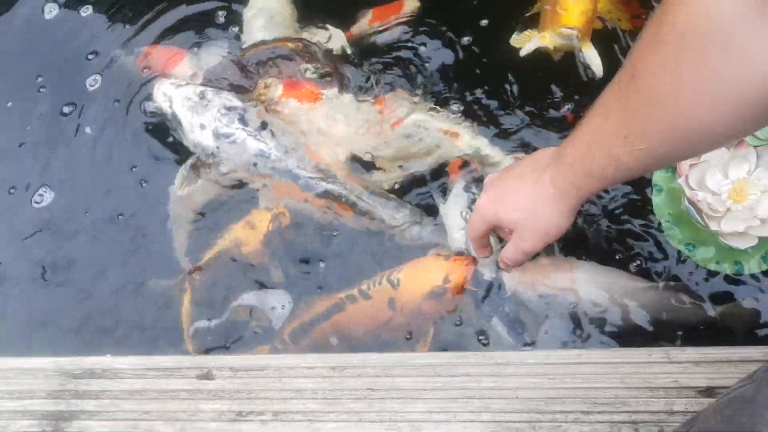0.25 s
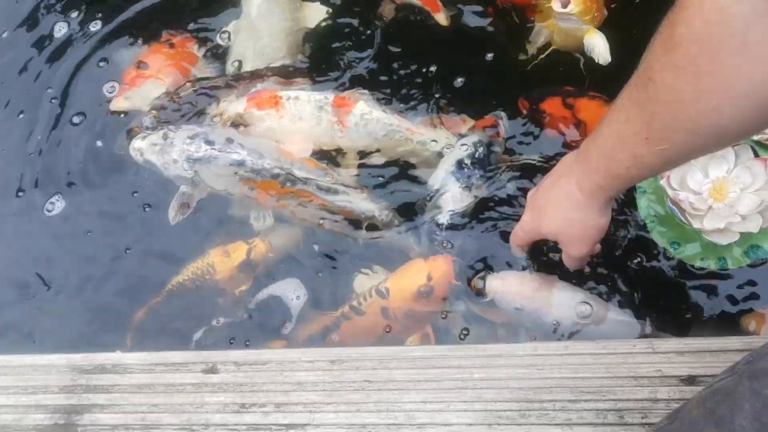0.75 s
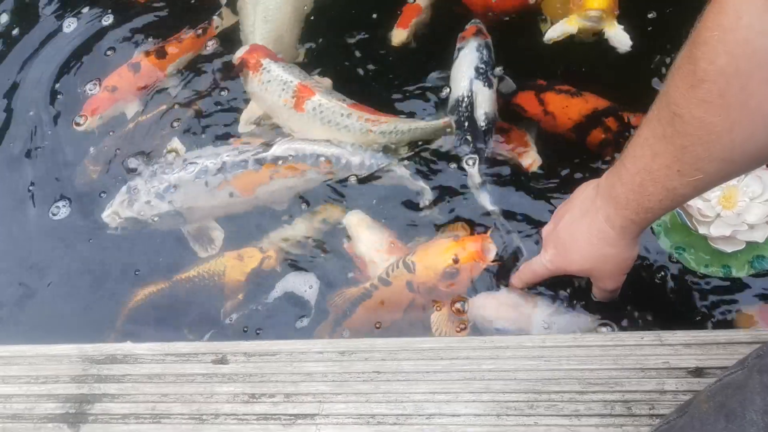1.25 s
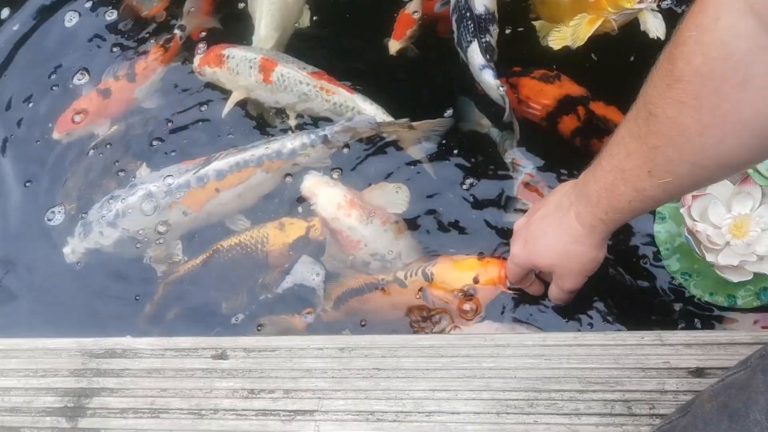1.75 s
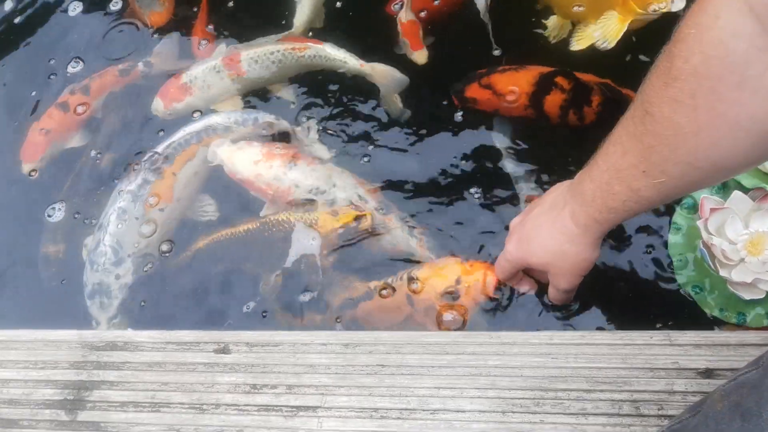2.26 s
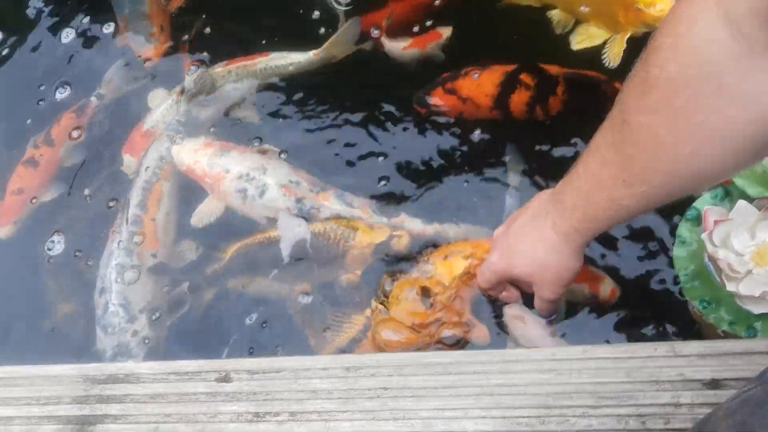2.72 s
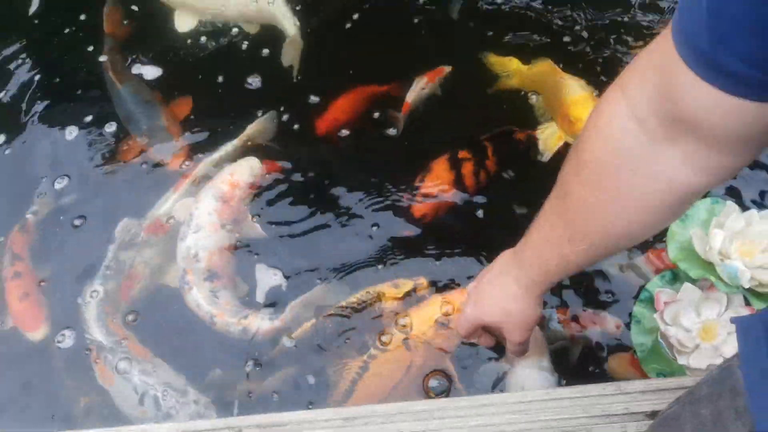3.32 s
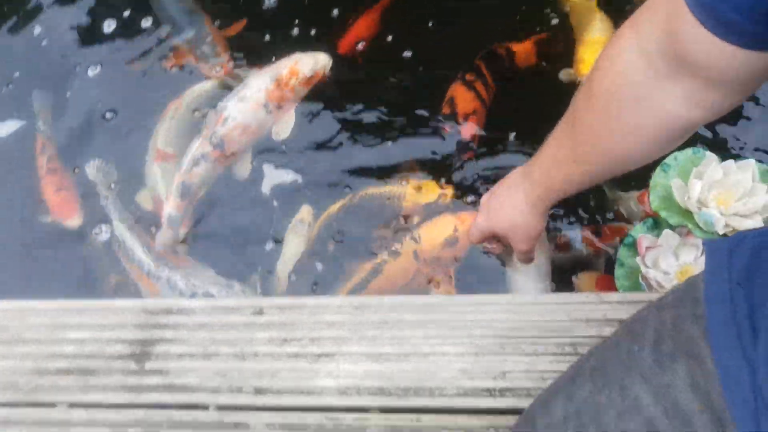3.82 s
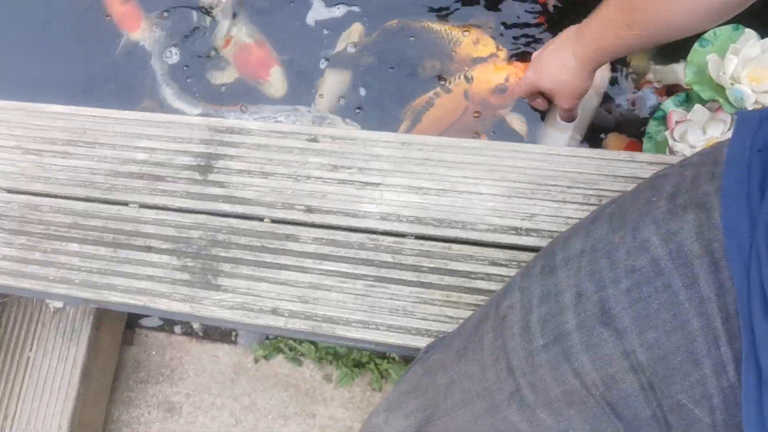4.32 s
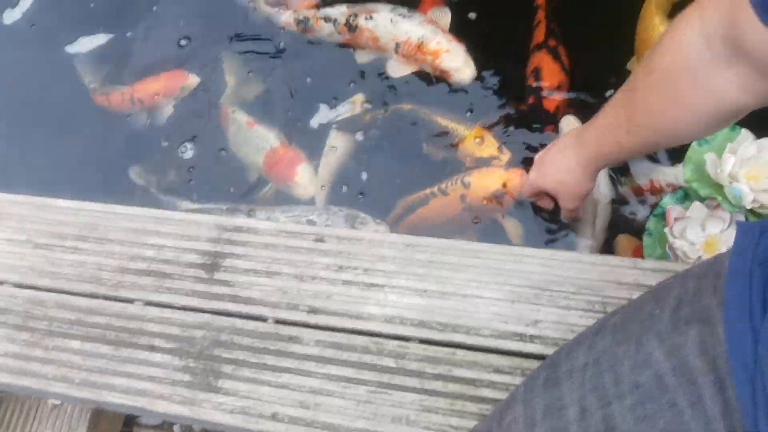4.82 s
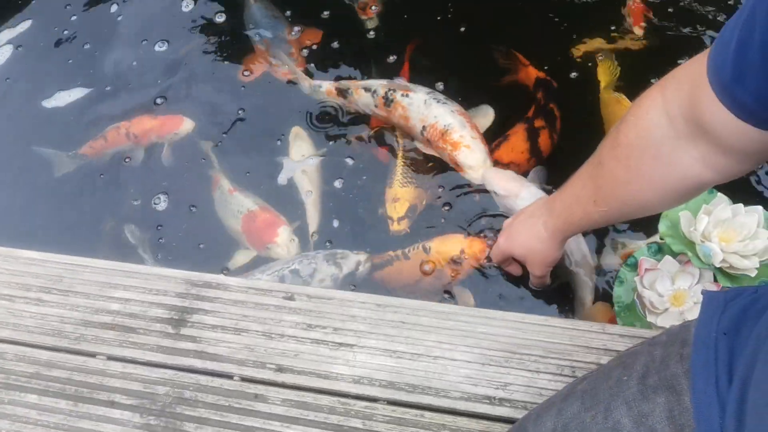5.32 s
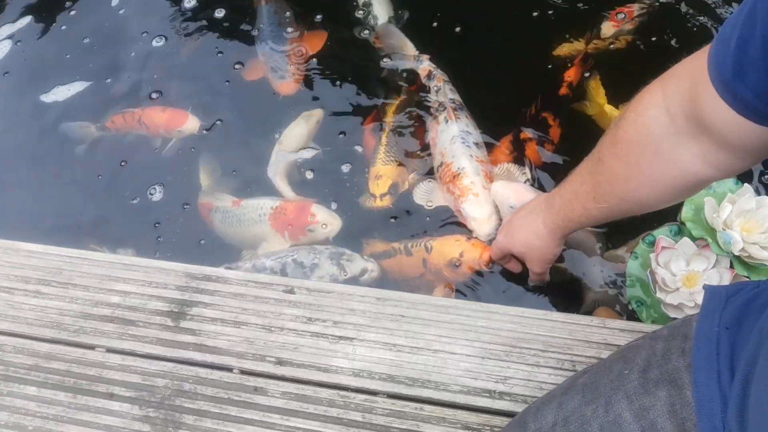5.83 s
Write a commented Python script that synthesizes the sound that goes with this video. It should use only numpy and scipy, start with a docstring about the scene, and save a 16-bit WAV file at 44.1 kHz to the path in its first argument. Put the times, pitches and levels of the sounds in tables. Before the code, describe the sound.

At the edge of a garden pond, water trickles steadily in drops and small bubbles while feeding koi make brief slurps and light splashes. A pump hums faintly and a distant engine drones underneath. Fingers bump the microphone softly at first. Midway, skin squeaks on the casing, followed by loud, close runs of creaking ticks and low rumble. The handling then settles, leaving the trickle, a few more slurps and gentle engine swells.

```python
"""Koi crowd a hand at the edge of a garden pond. Throughout, water trickles in drops and bubbles, a pump
hums and a far engine slowly sags in pitch. From the start mouths slurp and splash, and the fingers that
hold the camera knock on its case over a low rumble. A faint whine sinks from 1.3 s. At 2.7 s skin
squeaks, then creeps over the case in loud stick-slip ticks until 4.1 s. Last come more slurps, two soft
knocks and swells of the engine."""
import sys
import numpy as np
from scipy.fft import rfft, irfft, next_fast_len
from scipy.io import wavfile
from scipy.ndimage import map_coordinates

SR = 44100
rng = np.random.default_rng(int(sys.argv[2]) if len(sys.argv) > 2 else 0)


def to_wav(sig):
    """Store sig (one row per channel, or 1-D mono) as 16-bit WAV at the path in sys.argv[1].

    Samples outside -1..1 are clipped; the rate is SR.
    """
    pcm = np.clip(np.atleast_2d(sig), -1, 1) * 32767
    pcm = np.round(pcm).astype(np.int16)
    wavfile.write(sys.argv[1], SR, pcm.T)  # frames by channels


N = 267687
TIME_S = np.arange(N) / SR
TOP_HZ = 15850


def amp(db):
    return 10 ** (np.asarray(db) / 20)


def unit_rms(x):
    return x / np.sqrt(np.mean(x ** 2) + 1e-20)


def gain_curves(rows, hz):
    """Gains from rows of (Hz, dB, ..), interpolated over log frequency."""
    row_hz, *columns_db = np.transpose(rows)
    return amp([np.interp(np.log(hz + 1), np.log(row_hz + 1), db) for db in columns_db])


def wobble(knots_per_s):
    """A smooth random curve."""
    knots = rng.standard_normal(int(N * knots_per_s / SR) + 4)
    return map_coordinates(knots, [TIME_S * knots_per_s])


def swell(start_s, end_s, fade_s):
    """A gain that rises smoothly, holds and falls."""
    inside_s = np.minimum(TIME_S - start_s, end_s - TIME_S)
    return np.sin(np.pi / 2 * np.clip(inside_s / fade_s + .5, 0, 1)) ** 2


def filtered(x, response):
    """Apply a complex frequency response."""
    size = next_fast_len(N + SR // 2)
    return irfft(rfft(x, size) * response(np.fft.rfftfreq(size, 1 / SR)), size)[..., :N]


def low_cut(hz, corner_hz):
    """First-order high-pass response."""
    return 1j * hz / (1j * hz + corner_hz)


def resonance(hz, centre_hz, width_hz):
    """Response of one damped mode."""
    return 1j * hz * width_hz / (centre_hz ** 2 - hz ** 2 + 1j * hz * width_hz)


def minimum_phase(gain):
    """The response with this gain that rings only after its cause."""
    cepstrum = irfft(np.log(np.maximum(gain, 1e-6)))
    half = cepstrum.shape[-1] // 2
    return np.exp(rfft(cepstrum * np.r_[1, np.full(half - 1, 2), 1, np.zeros(half - 1)]))


def add(track, start_s, sound):
    part = track[..., max(0, round(start_s * SR)):][..., :sound.shape[-1]]
    part += sound[..., :part.shape[-1]]


def far_whine(start_s=1.3, end_s=2.22, from_hz=405, to_hz=335, settle_s=0.39, db=-61, waver=0.014):
    """A faint whine wavers, sinks and levels off."""
    hz = to_hz + (from_hz - to_hz) * np.exp(-np.maximum(TIME_S - start_s, 0) / settle_s)
    hz *= 1 + waver * wobble(40.2)
    return amp(db) * swell(start_s, end_s, fade_s=.2) * np.sin(2 * np.pi * np.cumsum(hz) / SR)


# Pump hum. Each row: frequency in Hz, RMS level in dB.
PUMP_TONES = [(99.7, -54), (149.5, -65)]


def pump(flutter_db=0.86):
    """The pump hums at a steady pitch; its level flutters slightly."""
    return np.sqrt(2) * sum(amp(db + flutter_db * wobble(6)) * np.sin(2 * np.pi * hz * TIME_S)
                            for hz, db in PUMP_TONES)


# Engine tones. Each row: multiple of the firing rate, resting level in dB, dB added right and taken left.
ENGINE_TONES = [(2, -55, 2), (3, -61, 1), (4, -64, 3.5), (6, -69.5, 1)]
# Swells of those tones. Each row: multiple, start in seconds, end in seconds, level in dB.
ENGINE_SWELLS = [(2, 1.38, 3.3, -46), (3, 4.24, 5.97, -51), (4, 3.61, 4.9, -54), (4, 5.345, 6.04, -47.5),
                 (6, 5.4, 6.2, -63)]


def far_engine(firing_hz=58.2, sag_hz_per_s=.47, waver=0.01386, flutter_db=2.0, fade_s=0.46):
    """Harmonics of the firing rate sag as the engine slows; each swells and flutters."""
    hz = (firing_hz - sag_hz_per_s * TIME_S) * (1 + waver * wobble(14))
    phase = 2 * np.pi * np.cumsum(hz) / SR
    track = np.zeros((2, N))
    for order, rest_db, lean_db in ENGINE_TONES:
        swells = sum(amp(db) * swell(start_s, end_s, fade_s)
                     for multiple, start_s, end_s, db in ENGINE_SWELLS if multiple == order)
        level = np.hypot(amp(rest_db), swells) * amp(flutter_db * wobble(22))
        track += level * amp([[-lean_db], [lean_db]]) * np.sin(order * phase)
    return np.sqrt(2) * track


def bubbles(starts_s, hz, gains, decay_cycles, rise, samples):
    """Each bubble rings as a damped sine that rises in pitch as it dies."""
    t = np.arange(samples) / SR
    hz = np.clip(hz, 100, TOP_HZ)[:, None]
    decay = np.exp(-hz * t / decay_cycles)
    phase = 2 * np.pi * hz * t * (1 + rise * (1 - decay))
    rings = gains[:, None] * np.sqrt(hz) * decay * np.sin(phase)
    indices = (starts_s * SR).astype(int)[:, None] + np.arange(samples)
    return np.bincount(np.maximum(indices, 0).ravel(), rings.ravel(), N)[:N]


def gurgle(hollow_hz=615, width_hz=70, db=-57, spread_octaves=.2, spread_db=4.4, count=2400):
    """Larger bubbles ring in the hollow of the inflow."""
    pitch, size = rng.standard_normal((2, count))
    starts_s = rng.uniform(0, N / SR, count)
    bubble_hz = hollow_hz * 2 ** (spread_octaves * pitch)
    plunge = bubbles(starts_s, bubble_hz, amp(spread_db * size), decay_cycles=4.4, rise=0.019, samples=1200)
    return amp(db) * unit_rms(filtered(plunge, lambda hz: resonance(hz, hollow_hz, width_hz)))


# The microphone ports turn slightly from the water: start and end in seconds, gain before and after in dB.
PORT_TURN = (1, 5, 1.04, 0.37)


def trickle(tick_db=-4, fizz_db=-6, tick_spread_db=3.5, fizz_spread_db=3.0, flutter_db=0.56, count=7000):
    """Falling water: drop ticks and tiny bubbles on a noise wash, independent at each port."""
    ports = np.zeros((2, N))
    for port in range(2):
        starts_s = rng.uniform(0, (N - 1) / SR, count)
        size = np.minimum(rng.exponential(size=count), 4.5)
        impacts = amp(tick_spread_db * size) * rng.choice([-1, 1], count)
        ticks = np.bincount((starts_s * SR).astype(int), impacts, N)
        hz = 1200 * (TOP_HZ / 1200) ** np.sqrt(rng.random(count))  # small bubbles outnumber large ones
        gains = amp(fizz_spread_db * rng.permutation(size))
        fizz = bubbles(starts_s, hz, gains, decay_cycles=51, rise=0.029, samples=700)
        wash = rng.standard_normal(N)
        ports[port] = amp(tick_db) * unit_rms(ticks) + amp(fizz_db) * unit_rms(fizz) + wash
    turn_db = np.interp(TIME_S, PORT_TURN[:2], PORT_TURN[2:])
    return ports * amp(flutter_db * wobble(24) + turn_db)


# Mouths at the surface. Each row: start in seconds, length in seconds, pitch in Hz, relative level in dB.
KOI_SLURPS = [(0.045, 0.025, 2000, -7), (0.166, 0.026, 6070, -3), (0.921, .025, 2600, -9),
              (1.4093, .007, 4500, 5), (1.682, 0.034, 2420, -6.5), (1.787, 0.024, 3480, -0.5),
              (2.213, 0.051, 6940, -2), (2.628, 0.013, 13500, 4), (4.453, 0.046, 3740, -4),
              (5.046, .025, 2360, -7.5), (5.337, 0.012, 5200, -2.5), (5.72, 0.029, 12450, 0),
              (5.851, .013, 2130, 1.5)]


def koi_slurps(right_db=-3, spread_octaves=0.15, count=14):
    """Each suck or splash frees a cluster of bubbles around one pitch."""
    track = np.zeros((2, N))
    for start_s, length_s, centre_hz, db in KOI_SLURPS:
        starts_s = start_s + length_s * rng.random(count)
        for port, port_db in enumerate((0, right_db)):
            pitch, size_db = rng.standard_normal((2, count))
            hz = centre_hz * 2 ** (spread_octaves * pitch)
            cluster = bubbles(starts_s, hz, amp(size_db), decay_cycles=4.8, rise=0.041, samples=900)
            track[port] += amp(db + port_db) * unit_rms(cluster) * np.sqrt(length_s * SR / N)
    return track


# Colour of the water at the ports. Each row: frequency in Hz, left gain in dB, right gain in dB.
WATER_COLOUR = [(277, -40.5, -34), (390, -38.5, -43.5), (642, -32.5, -34), (730, -41, -49.5),
                (1590, -39.5, -49), (2170, -36.5, -51), (3660, -41, -55.5), (4454, -34.5, -57.5),
                (5225, -26.5, -55), (5860, -39.5, -60.5), (7780, -56, -60), (9170, -46, -43.5),
                (10760, -34, -39), (12880, -51.5, -50.5), (15400, -48, -57.9)]


def port_colour(water, cut_hz=87):
    """Each microphone port colours the water in its own way and sheds the bass."""
    return filtered(water, lambda hz: minimum_phase(gain_curves(WATER_COLOUR, hz)) * low_cut(hz, cut_hz) ** 2)


# Spectrum of the grip's rumble. Each row: frequency in Hz, relative level in dB.
RUMBLE_SPECTRUM = [(15, -16), (28, -0.5), (44, 3.5), (72, -13), (120, -11.5), (200, -18.5), (320, -27),
                   (600, -57)]
# Shifts of the grip. Each row: start in seconds, end in seconds, relative level in dB.
GRIP_SHIFTS = [(0.177, .58, -39), (1.35, 1.46, -41), (2.4, 2.538, -30.5), (2.565, 3.368, -36),
               (2.82, 3.14, -29.5)]
# Slow shoves. Each row: start in seconds, relative peak in dB, length in seconds.
GRIP_SHOVES = [(0.218, -25.5, 0.02), (0.953, -32, 0.046), (1.403, -31.5, 0.03), (2.483, -37, .024),
               (2.61, -29.5, 0.043), (2.911, -19, 0.036), (2.955, -19.5, 0.027), (3.2, -19, 0.01)]


def grip_rumble(rest_db=-44.5, fade_s=.05, side_db=-5, rumble_trim_db=-2.0, left_db=-2, right_db=1):
    """The grip rumbles, more while it shifts, and each shove rocks the case once."""
    mid, side = filtered(rng.standard_normal((2, N)), lambda hz: gain_curves(RUMBLE_SPECTRUM, hz))
    rumble = unit_rms(np.array([mid + amp(side_db) * side, mid - amp(side_db) * side]))
    shift_power = sum((amp(db) * swell(start_s, end_s, fade_s)) ** 2 for start_s, end_s, db in GRIP_SHIFTS)
    track = amp(rumble_trim_db) * np.sqrt(amp(rest_db) ** 2 + shift_power) * rumble
    for start_s, db, length_s in GRIP_SHOVES:
        add(track, start_s, amp(db) * np.sin(2 * np.pi * np.linspace(0, 1, int(length_s * SR))))
    return track * amp([[left_db], [right_db]])


def skin_squeak(start_s=2.705, length_s=0.071, from_hz=320, to_hz=660, db=-37, fade_db=4, waver=0.021):
    """Skin starts to slide with a short, unsteady rising squeak."""
    progress = np.linspace(0, 1, int(length_s * SR))
    hz = from_hz * (to_hz / from_hz) ** progress * (1 + waver * wobble(299)[:len(progress)])
    envelope = amp(db - fade_db * progress) * np.sqrt(4 * progress * (1 - progress))
    track = np.zeros(N)
    add(track, start_s, envelope * np.sin(2 * np.pi * np.cumsum(hz) / SR))
    return track


# Modes of the camera case. Each row: centre in Hz, width in Hz, left gain in dB, right gain in dB.
CASE_MODES = [(97, 22, 1.5, -5.5), (201.5, 66, -23, 2.5), (269.3, 71, -2.5, 3), (375, 270, -37, -7),
              (611, 83, -2, 1.5), (864, 193, -28, 7), (1275, 91, -3, -26), (2260, 710, -34, 9)]


def case_response(hz, scatter_db=1):
    """The case rings in damped modes, their balance a little different at each push."""
    return sum(amp(np.array([[left_db], [right_db]]) + rng.normal(0, scatter_db))
               * resonance(hz, centre_hz, width_hz) for centre_hz, width_hz, left_db, right_db in CASE_MODES)


# Runs of slips. Each row: first and last start in seconds, count, first and last right peak in dB,
# central sharpness in Hz, extra left gain in dB.
FINGER_CREEPS = [(2.7774, 2.7938, 2, -15.5, -11.5, 252, 5), (2.8391, 2.8906, 3, -9.5, -11, 293, 6),
                 (2.8843, 2.9188, 5, -14.5, -18.5, 744, 3), (2.9346, 2.95, 2, -14, -12.5, 830, 2),
                 (3.138, 3.187, 5, -27, -17.5, 330, 0), (3.2293, 3.301, 7, -17.5, -12, 467, 2),
                 (3.3433, 3.3887, 3, -11, -9.5, 610, 2), (3.753, 3.872, 3, -17.5, -23, 530, 3),
                 (4.028, 4.0495, 2, -20, -17.5, 590, 5.5), (4.0696, 4.0892, 3, -13.5, -14, 610, 4)]


def creep_slips(jitter_s=.0007, scatter_db=0.57, octaves_per_db=0.16):
    """A creeping finger sticks and slips, never quite on time; a harder slip is sharper."""
    rows = []
    for first_s, last_s, count, first_db, last_db, sharp_hz, lean_db in FINGER_CREEPS:
        starts_s = np.linspace(first_s, last_s, count) + np.pad(rng.normal(0, jitter_s, count - 2), 1)
        force_db = np.linspace(first_db, last_db, count) + rng.normal(0, scatter_db, count)
        sharpness_hz = sharp_hz * 2 ** (octaves_per_db * (force_db - force_db.mean()))
        rows += [(s, db, hz, lean_db) for s, db, hz in zip(starts_s, force_db, sharpness_hz)]
    return rows


# Single slips. Each row: start in seconds, right peak in dB, sharpness in Hz, extra left gain in dB.
FINGER_KNOCKS = [(0.154, -25.5, 140, 6), (0.2148, -16, 135, -0.5), (0.4552, -26, 169, -8),
                 (0.916, -25, 1200, 4), (0.9168, -14.5, 285, 3.5), (0.9354, -27.5, 250, 4),
                 (1.9892, -28, 1100, -3), (1.9906, -21.5, 310, 9), (3.0774, -7.5, 170, -3),
                 (3.2018, -6, 250, -10), (3.486, -6, 1110, 4.5), (3.5009, -14.5, 745, -1),
                 (4.9083, -23, 680, 1), (5.3775, -30, 560, 3)]


def finger_slips(left_lag_s=0.00065, left_cut_hz=170, left_db=1, body_cut_hz=120, snap_db=-14, damping=0.85):
    """Each slip is one push on the case: a soft one only thuds, a sharp one wakes the higher modes."""
    hz = np.fft.rfftfreq(4096, 1 / SR)
    # the left port lies farther from the fingers: later and thinner
    left_path = amp(left_db) * np.exp(-2j * np.pi * hz * left_lag_s) * low_cut(hz, left_cut_hz)
    paths = np.array([left_path, np.ones(len(hz))]) * low_cut(hz, body_cut_hz)
    track = np.zeros((2, N))
    for start_s, db, sharp_hz, lean_db in FINGER_KNOCKS + creep_slips():
        u = 1j * hz / sharp_hz
        push = 1 / ((1 + u) * (1 + damping * u + u * u))  # falls steeply above sharp_hz
        snap = amp(snap_db) / (1 + u) ** 2  # letting go leaves a faint edge
        knock = irfft((push + snap) * case_response(hz) * paths)
        add(track, start_s, -amp([[db + lean_db], [db]]) * knock / np.abs(knock[1]).max())
    return track


def scene():
    """Water and far machines, with the hand on the camera closest of all."""
    water = port_colour(trickle() + koi_slurps()) + gurgle()
    machines = far_engine() + pump() + far_whine()
    hand = finger_slips() + skin_squeak() + grip_rumble()
    return machines + water + hand


def record(dry):
    """The camera keeps nothing above its band limit."""
    return filtered(dry, lambda hz: hz < TOP_HZ)


dry = scene()
out = record(dry)
to_wav(out)
```